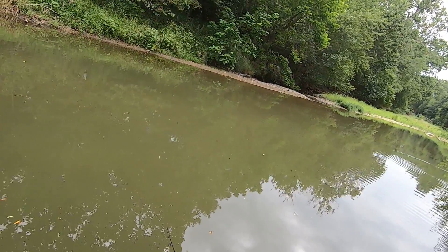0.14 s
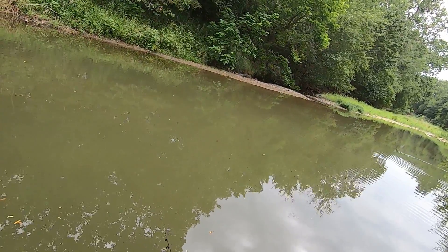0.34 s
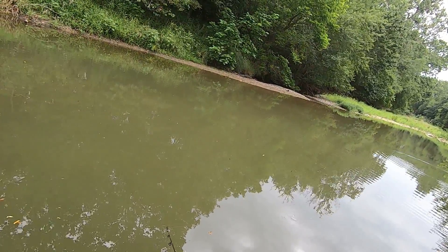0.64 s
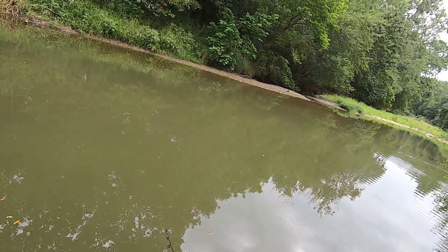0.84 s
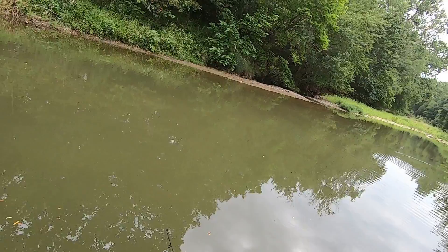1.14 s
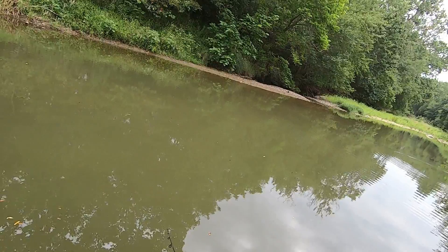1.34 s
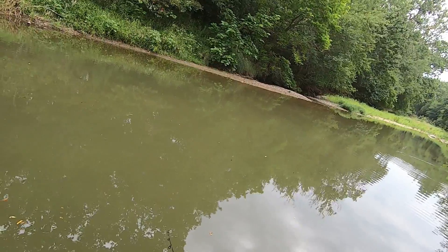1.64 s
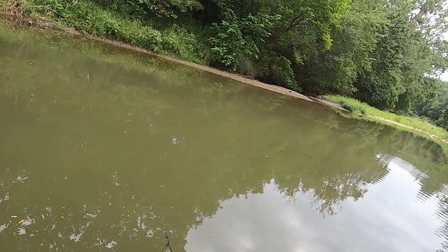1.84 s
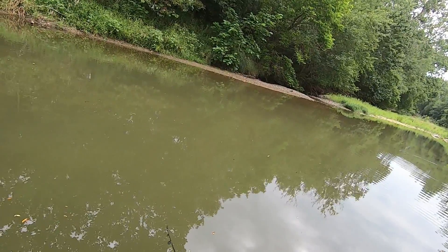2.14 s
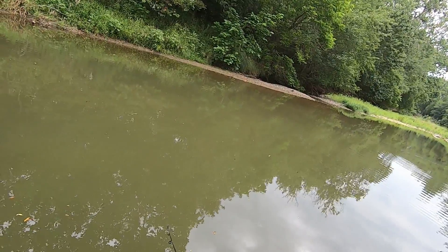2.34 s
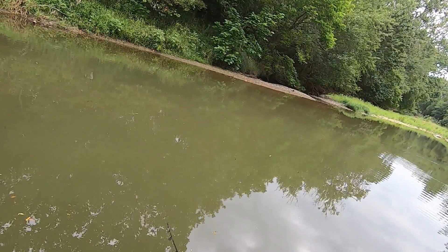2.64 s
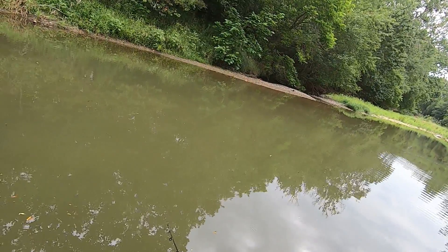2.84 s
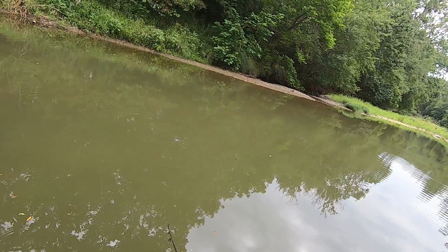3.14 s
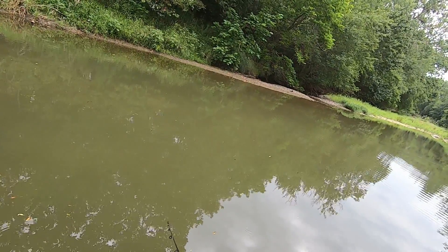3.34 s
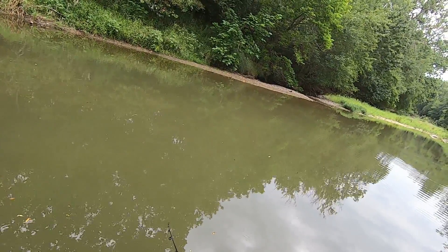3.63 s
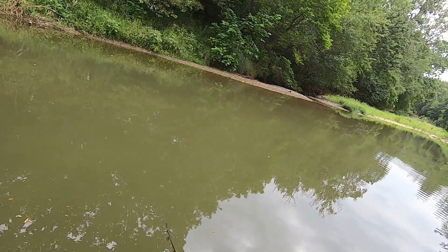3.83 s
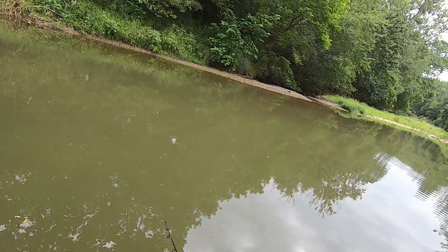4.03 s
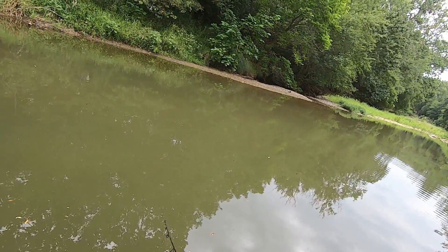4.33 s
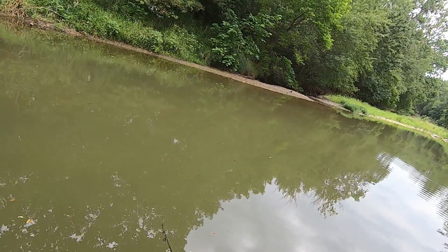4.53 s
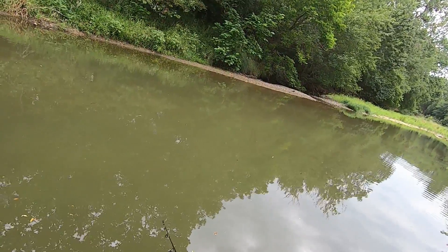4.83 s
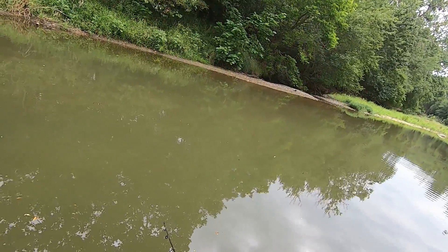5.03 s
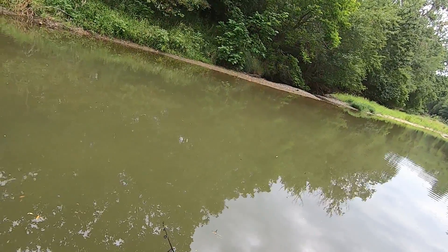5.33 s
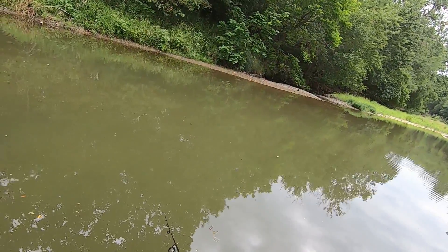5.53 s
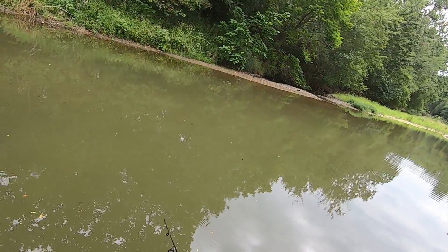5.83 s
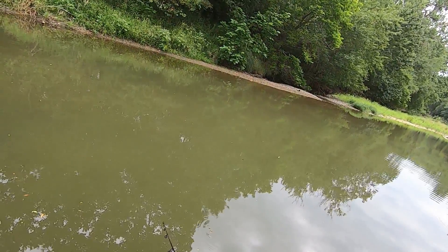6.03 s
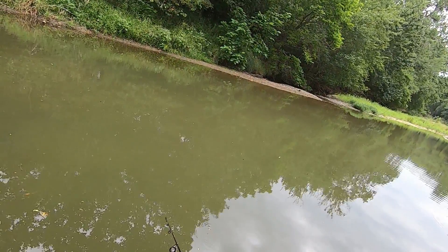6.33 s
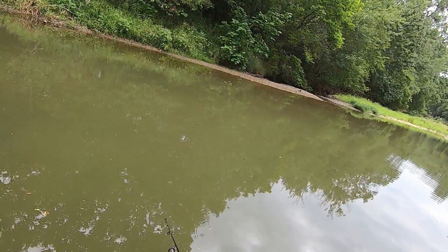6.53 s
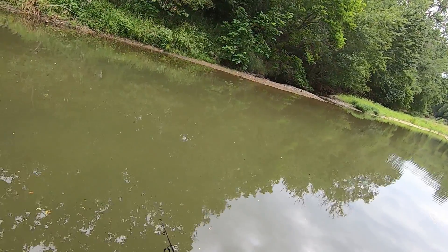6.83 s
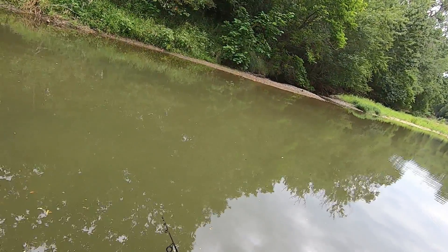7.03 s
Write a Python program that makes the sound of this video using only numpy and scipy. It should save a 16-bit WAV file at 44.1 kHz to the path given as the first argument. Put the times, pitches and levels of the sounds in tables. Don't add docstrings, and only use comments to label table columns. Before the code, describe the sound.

For about 7 seconds, a dense crowd of ground crickets trills around 7 to 8 kHz, bright, wide and almost constant, slightly stronger at the end. Far below it are faint traffic, leaf hush, wavering low motor hum and soft air puffs, most noticeable around 1.5 s. A far katydid is already buzzing faintly until 0.8 s. Four dry ticks from a nearer one lead to a rapid rasp from 1.1 to 2.0 s. The far one answers at 2.1-2.4 and 2.6-3.3 s. Ticks from 3.5 s, leaning left, precede another near buzz at 3.8-4.9 s; the far one follows until 5.8 s. Ticks return from 5.5 s, and a third near buzz runs 5.9-7.1 s. Short distant bird notes occur near 2.4, 3.5 and 4.3 s. Two tiny bubbles plip at 6.0 s, then a thin, echo-blurred bird whistle rises, slurs and sags until 6.9 s.

```python
import sys
import numpy as np
from scipy import signal
from scipy.fft import rfft, irfft, next_fast_len
from scipy.io import wavfile
from scipy.ndimage import map_coordinates

SR = 44100
rng = np.random.default_rng(int(sys.argv[2]) if len(sys.argv) > 2 else 0)


def dump_mix(stems):
    frames = np.atleast_2d(stems).T
    limited = np.clip(frames, -1, 1)
    pcm = np.round(limited * 32767).astype(np.int16)
    wavfile.write(sys.argv[1], SR, pcm)


def volts_from_decibels(level):
    exponent = np.asarray(level, float) / 20
    return 10 ** exponent


N = 316197
T = np.arange(N) / SR
SIZE = next_fast_len(N)
BINS_HZ = np.maximum(np.arange(SIZE // 2 + 1) * SR / SIZE, 1)

# frequency in Hz, level in dB per Hz.
TRAFFIC_COLOUR = [(45, -38), (70, -12.5), (115, -26), (140, -2.5), (190, -2.5), (270, -9), (400, -11.5),
                  (560, -33)]
# frequency in Hz, level in dB per Hz.
TYRE_COLOUR = [(330, -28), (450, -2.5), (580, -2), (720, -0.1), (900, -3.5), (1200, -23), (1600, -29)]
# time in seconds, rise over the steady road in dB,
# length in seconds.
PASSES = [
    (0.818, 2, 0.029),
    (1.508, 1.5, 0.15),
    (2.067, 3.5, 0.036),
    (2.817, 2.5, 0.025),
    (3.58, 4, 0.059),
    (4.295, 1.5, 0.27),
    (5.43, 3.5, 0.056),
    (5.623, 4.5, 0.069),
    (6.325, 5.5, 0.031),
]
# frequency in Hz, level in dB per Hz.
LEAF_COLOUR = [(530, -20.5), (900, -5), (1090, -3), (2000, -6.5), (3800, -5), (5770, -10), (6100, -10),
               (7930, -29), (13400, -120)]
# time in seconds, level in dB.
RUSTLE = [
    (0, -66.5),
    (1.9, -65.5),
    (3.7, -66),
    (4.3, -64),
    (7.17, -64.5),
]

# time in seconds, level in dB.
DRONE_LEVEL = [(0, -70.5), (1.0, -72), (1.35, -60), (2.1, -68.5), (2.4, -61.5), (2.85, -63.5), (3.2, -60.5),
               (3.55, -63), (4.0, -58), (5.4, -59), (6.4, -64.5), (6.8, -73), (7.17, -66)]
# pitch in Hz, wander in Hz, flutter in dB.
DRONE_VOICE = (156.8, 0.27, 0.99)
# time in seconds, peak in dB, length in seconds.
SURGES = [(.15, -71, 0.074), (.72, -67, 0.24), (1.28, -63.5, 0.1), (1.642, -63.5, .07),
          (1.96, -64.5, 0.071), (2.587, -64.5, 0.075), (3.19, -72, .08), (3.87, -73, 0.05),
          (4.6, -75, 0.58), (6.782, -72, 0.12), (7.1, -72, .08)]
# pitch in Hz, level in dB at the start, level in dB at the end.
SURGE_TONES = [
    (107.2, 0, -5),
    (76.8, -6.5, 2.5),
]
# pitch in Hz, width in Hz, level in dB at the start, middle and end.
HUMS = [
    (462, 2.8, -71.5, -89.5, -105),
    (92.3, 2.4, -67.5, -78, -81),
    (208.6, 11, -86, -73, -72),
    (184.8, 3.3, -76.5, -70, -70),
]

# time in seconds, peak in dB.
PUFFS = [(0.05, -76), (.4, -72), (.9, -65), (1.25, -62), (1.54, -59), (2.28, -68), (2.68, -67), (2.87, -68),
         (3.28, -70), (3.43, -70), (3.75, -67), (4.08, -73), (4.73, -71), (5.21, -69), (5.36, -91),
         (6.25, -73), (6.75, -72)]
# frequency in Hz, level in dB per Hz.
BREEZE_COLOUR = [(8, 5), (20, -12), (30, -7), (45, -8.5), (70, -21), (110, -34)]
# time in seconds, pitch in Hz, peak in dB, time to fall 60 dB in seconds.
PLIPS = [
    (6.028, 666, -46, 0.033),
    (6.058, 800, -46, 0.038),
]

# time in seconds, pitch in Hz, level in dB.
RISE = [
    (6.11, 4090, -64),
    (6.14, 4570, -59),
    (6.16, 4636, -57),
    (6.2, 4270, -67),
]
# time in seconds, pitch in Hz, level in dB.
SLUR = [
    (6.215, 4140, -57),
    (6.235, 4550, -53),
    (6.269, 4720, -68),
    (6.369, 4820, -62.5),
    (6.402, 4500, -71),
]
# time in seconds, pitch in Hz, level in dB.
SAG = [
    (6.409, 4263, -60),
    (6.471, 3800, -64),
    (6.531, 3709, -67),
    (6.598, 3849, -66),
    (6.629, 4090, -64),
    (6.735, 4060, -69),
    (6.785, 4250, -63),
    (6.89, 4150, -76),
]
# time in seconds, length in seconds, first pitch in Hz, last pitch in Hz,
# peak in dB.
NOTES = [
    (2.401, .033, 6200, 4250, -56.5),
    (3.43, .115, 4680, 4700, -71),
    (3.597, 0.11, 4900, 4915, -67),
    (4.29, .035, 4800, 4900, -66),
    (6.808, .04, 4500, 5460, -69),
]

# first stroke in seconds, end in seconds, early level in dB, final level in dB.
NEAR_BUZZ = [
    (1.089, 2.045, -60.5, -63),
    (3.780, 4.92, -61.5, -63),
    (5.945, 7.082, -62, -63.5),
]
# first stroke in seconds, end in seconds, early level in dB, final level in dB.
FAR_BUZZ = [
    (-.018, .78, -69, -74),
    (2.066, 2.41, -68, -76),
    (2.606, 3.33, -76, -69.5),
    (4.945, 5.76, -71.5, -76),
]
# time in seconds, peak in dB, left over right in dB.
TICKS = [(0.8051, -55, 0), (0.8834, -50.5, -1), (0.9448, -50, 0), (1.0121, -51.5, 0), (2.4483, -62, 0),
         (2.5162, -62, 0), (3.4725, -57, 2), (3.5463, -52, 4), (3.6152, -53, 3.5), (3.6855, -52, 4),
         (5.5394, -66, 0), (5.7853, -52, 0), (5.8486, -51, 2), (5.9135, -53, 0)]
# frequency in Hz, level in dB per Hz.
NEAR_WING = [(9000, -26), (9600, -0.5), (9950, -1.5), (10250, -2), (10370, 0), (10480, -4), (10600, 4.5),
             (10800, -4.5), (11700, -5), (12300, -6), (13000, -7), (13800, -13), (14400, -21), (15700, -40)]
# frequency in Hz, level in dB per Hz.
FAR_WING = [(9200, -11), (9700, -17), (10000, -2), (10600, 1.5), (11200, -4), (12000, -1.5), (12700, -7),
            (13800, -14), (14500, -10.5), (15750, -18)]

# time in seconds, level in dB, left over right in dB.
CROWD = [
    (0, -44.5, -0.5),
    (2.9, -45, 0),
    (3.2, -44.5, -1.5),
    (3.8, -45, -0.5),
    (5.1, -44, -1),
    (6.6, -44.5, 0),
    (7.17, -43.5, -1.5),
]
# frequency in Hz, level in dB per Hz.
CROWD_COLOUR = [(5700, -51), (6250, -27.5), (6500, -21.5), (6750, -13), (7000, -6), (7250, -0.5), (7500, 0),
                (7770, 1.56), (8000, -6), (8250, -9), (8500, -17), (8950, -18), (9250, -32), (9500, -31)]

# frequency in Hz, side over mid in dB.
PORT_SIDE = [(60, -9.5), (160, -12), (270, -5.5), (450, -5.5), (740, -1), (1220, 3.5), (2010, -1.5),
             (3330, -2), (6000, 0.5), (7200, 2.5), (8200, 5), (9000, 3.5), (9800, 2.5), (11700, 1.5)]
# frequency in Hz, left over right in dB.
PORT_BALANCE = [(60, -0.1), (450, -2), (1220, 2.5), (3330, 0), (7200, -0.1), (7800, -1), (8400, -2.5),
                (9000, -5), (10000, 0.5), (11000, 2), (12000, -2.5), (12800, -0.5), (14500, 6)]
# frequency in Hz, share of the side that is mid shifted in phase.
PORT_LEAD = [(300, -0.017), (600, 0.22), (1200, 0.39), (2200, -0.33), (4000, -0.072), (6000, .01)]


def rms_one(x):
    return x / np.sqrt(np.mean(x ** 2) + 1e-20)


def in_time(rows):
    s, *columns = np.transpose(rows)
    return [np.interp(T, s, column) for column in columns]


def while_sounding(rows, fade_s):
    from_edge = np.minimum(T - rows[0][0], rows[-1][0] - T)
    return np.clip(from_edge / fade_s + 0.5, 0, 1)


def bumps(s, height, length_s):
    return sum(h * np.exp(-((T - at) / w) ** 2 / 2) for at, h, w in np.broadcast(s, height, length_s))


def drift(rate_hz):
    knots = rng.standard_normal(int(N / SR * rate_hz) + 3)
    return map_coordinates(knots, [np.arange(N) * rate_hz / SR], order=2)


def colour_gain(points):
    hz, db = np.transpose(points)
    return volts_from_decibels(np.interp(np.log(BINS_HZ), np.log(hz), db, left=-150, right=-150))


def across_ports(points):
    hz, value = np.transpose(points)
    return np.interp(np.log(BINS_HZ), np.log(hz), value)


def panned(x, pan_db):
    return x * volts_from_decibels(np.array([pan_db / 2, -pan_db / 2]).reshape(2, -1))


def diffuse(gate, gain, more_side_db=0.0):
    noise = rfft(gate * rng.standard_normal((2, N)), SIZE)
    mid, own = noise * gain / np.sqrt(np.mean(gain ** 2))
    lead = np.clip(across_ports(PORT_LEAD), -1, 1)
    side = np.sqrt(1 - lead ** 2) * own + 1j * lead * mid
    side = side * volts_from_decibels(across_ports(PORT_SIDE) + more_side_db)
    return irfft(np.array([mid + side, mid - side]), SIZE)[:, :N]


def hush():
    passing_db = bumps(*np.transpose(PASSES))
    traffic_db = -66 + 3.5 * np.arange(N) / N + passing_db + 0.82 * drift(5.5)
    tyres_db = -67 + 0.8 * passing_db + 0.87 * drift(4.41)
    leaves_db = in_time(RUSTLE)[0] + 1.22 + 0.47 * drift(8)
    haze_db = -72 + 0.86 * drift(2.5)
    traffic = diffuse(volts_from_decibels(traffic_db), colour_gain(TRAFFIC_COLOUR))
    tyres = diffuse(volts_from_decibels(tyres_db), colour_gain(TYRE_COLOUR))
    leaves = diffuse(volts_from_decibels(leaves_db), colour_gain(LEAF_COLOUR))
    haze = diffuse(volts_from_decibels(haze_db), colour_gain(FAR_WING))
    return traffic + tyres + leaves + haze


def drone(hz, wander_hz, flutter_db):
    phase = 2 * np.pi * np.cumsum(hz + wander_hz * drift(5)) / SR
    port_phase = np.array([[0.2], [-0.2]])
    return np.sqrt(2) * volts_from_decibels(flutter_db * drift(8.3)) * np.sin(phase + port_phase)


def motors():
    out = volts_from_decibels(in_time(DRONE_LEVEL)[0]) * drone(*DRONE_VOICE)
    s, peak_db, length_s = np.transpose(SURGES)
    load = volts_from_decibels(-81.5) + bumps(s, volts_from_decibels(peak_db), length_s)
    for hz, start_db, end_db in SURGE_TONES:
        out = out + load * volts_from_decibels(np.linspace(start_db, end_db, N)) * drone(hz, wander_hz=1.26, flutter_db=2.5)
    for hz, width_hz, *course_db in HUMS:
        swell_db = np.interp(np.arange(N) / N, [0, 0.5, 1], course_db)
        throb_db = 2 * drift(11)
        resonance = 1 / (1 + ((BINS_HZ - hz) / width_hz) ** 2)
        out = out + volts_from_decibels(swell_db + throb_db) * diffuse(1.0, resonance)
    return out


def breeze():
    s, peak_db = np.transpose(PUFFS)
    lumps = volts_from_decibels(-74) + bumps(s, volts_from_decibels(peak_db), length_s=0.045)
    return diffuse(lumps * volts_from_decibels(1.7 * drift(7.6)), colour_gain(BREEZE_COLOUR), more_side_db=0.5)


def plips():
    out = 0
    for s, hz, peak_db, t60_s in PLIPS:
        age = np.clip(T - s, 0, 1)
        level = volts_from_decibels(peak_db - 60 * age / t60_s) * (1 - np.exp(-age / 0.004))
        out = out + level * np.sin(2 * np.pi * hz * age * (1 + 3 * age))
    return out


def glide(s, length_s, from_hz, to_hz, peak_db):
    edge_db, climb_hz = peak_db - 9, to_hz - from_hz
    return [(s, from_hz, edge_db),
            (s + 0.34 * length_s, from_hz + 0.256 * climb_hz, peak_db + 5.0),
            (s + 0.68 * length_s, from_hz + 0.705 * climb_hz, peak_db),
            (s + length_s, to_hz, edge_db)]


def birds(waver_db, echo_db, echo_s):
    whistles = np.zeros((2, N))
    port_phase = 0.69 * np.array([[1], [-1]])
    for note in [RISE, SLUR, SAG, *(glide(*row) for row in NOTES)]:
        hz, level_db = in_time(note)
        phase = 2 * np.pi * np.cumsum(hz * (1 + 0.00594 * drift(150))) / SR
        tone = np.sqrt(2) * np.sin(phase + port_phase)
        tone = tone * volts_from_decibels(level_db) * while_sounding(note, fade_s=0.0089)
        whistles += tone * volts_from_decibels(waver_db * np.array([drift(45), drift(45)]) - 4.0)
    age = np.arange(SR // 4) / SR
    trees = rng.standard_normal((2, len(age))) * np.exp(-age / echo_s) * np.minimum(age / 0.029, 1)
    trees *= volts_from_decibels(echo_db) / np.sqrt(np.sum(trees ** 2, axis=1, keepdims=True))
    return whistles + signal.fftconvolve(whistles, trees, axes=1)[:, :N]


def katydid(buzzes, strokes_per_s, short_db, catch_up_s, wing, sharp, echo, pan_db):
    gate = np.zeros(N)
    for start, end, early_db, final_db in buzzes:
        effort_db = np.interp(T, [start, end], [early_db, final_db])
        effort_db -= short_db * np.exp(-np.maximum(T - start, 0) / catch_up_s)
        stroke = (1 + np.cos(2 * np.pi * strokes_per_s * (T - start))) / 2
        stroke = stroke ** sharp * volts_from_decibels(0.73 * drift(45))
        rasp = rms_one(np.sqrt(stroke ** 2 + echo ** 2))
        gate += rasp * volts_from_decibels(effort_db) * while_sounding([[start], [end]], fade_s=0.013)
    return panned(diffuse(gate, colour_gain(wing)), pan_db)


def ticks(rise_s, fall_s):
    gate, lean_db = np.zeros(N), np.zeros(N)
    for s, peak_db, pan_db in TICKS:
        age = np.maximum(T - s + 0.01, 0)
        swell = 1 - np.exp(-(age / rise_s) ** 2)
        gate += volts_from_decibels(peak_db - 5.0) * swell * np.exp(-(age / fall_s) ** 2)
        lean_db[T > s - 0.02] = pan_db
    return panned(diffuse(gate, colour_gain(NEAR_WING)), lean_db)


def crickets(trill_db, wander_db, count=14):
    level_db, pan_db = in_time(CROWD)
    colour = colour_gain(CROWD_COLOUR)
    centres = np.linspace(5900, 9700, count)
    spacing = centres[1] - centres[0]
    crowd = 0
    for hz, (rate, start) in zip(centres, rng.random((count, 2))):
        band = np.cos(np.pi / 2 * np.clip((BINS_HZ - hz) / spacing, -1, 1)) * colour
        pulses_per_s = (30 + 28 * rate) * (1 + 0.0663 * drift(3))
        pulses = np.cos(2 * np.pi * (start + np.cumsum(pulses_per_s) / SR))
        gate = rms_one(volts_from_decibels(trill_db * pulses + wander_db * drift(22)))
        crowd = crowd + np.sqrt(np.mean(band ** 2)) * diffuse(gate, band)
    crowd = crowd / np.sqrt(np.mean(colour ** 2))
    return panned(crowd * volts_from_decibels(level_db), pan_db)


def scene():
    background = hush() + motors() + breeze() + plips()
    whistles = birds(waver_db=4, echo_db=-1, echo_s=0.04)
    far = katydid(FAR_BUZZ, strokes_per_s=45.7, short_db=3, catch_up_s=0.05,
                  wing=FAR_WING, sharp=1.9, echo=0.45, pan_db=-3.0)
    near = katydid(NEAR_BUZZ, strokes_per_s=47.4, short_db=10, catch_up_s=0.13,
                   wing=NEAR_WING, sharp=1.1, echo=0.55, pan_db=0.6)
    single = ticks(rise_s=0.0091, fall_s=0.024)
    return background + whistles + far + near + single + crickets(trill_db=1.0, wander_db=-0.27)


def top_cut(x):
    return signal.sosfilt(signal.butter(12, 15750, fs=SR, output="sos"), x)


def record(dry):
    balance = volts_from_decibels(across_ports(PORT_BALANCE) * [[0.5], [-0.5]])
    mix = irfft(rfft(dry, SIZE) * balance, SIZE)[:, :N]
    return top_cut(mix)


dry = scene()
out = record(dry)
dump_mix(out)
```